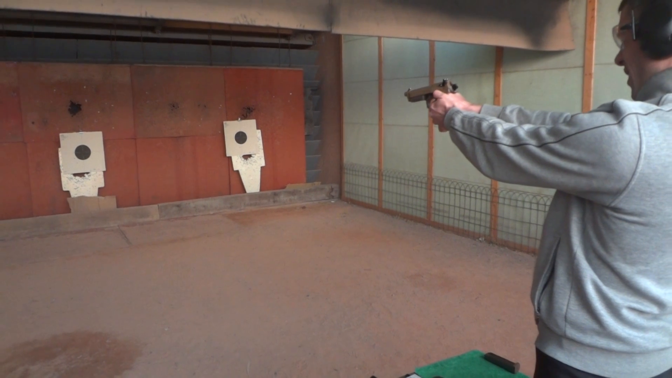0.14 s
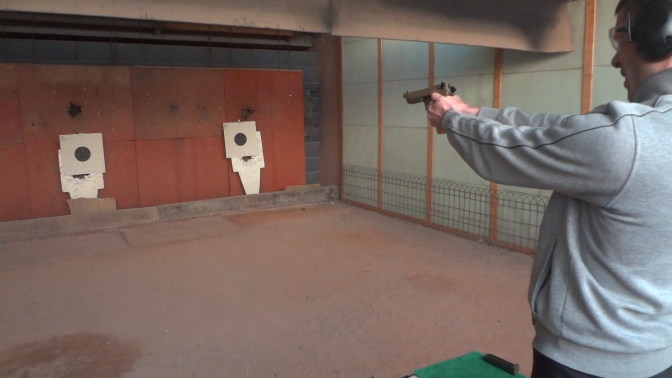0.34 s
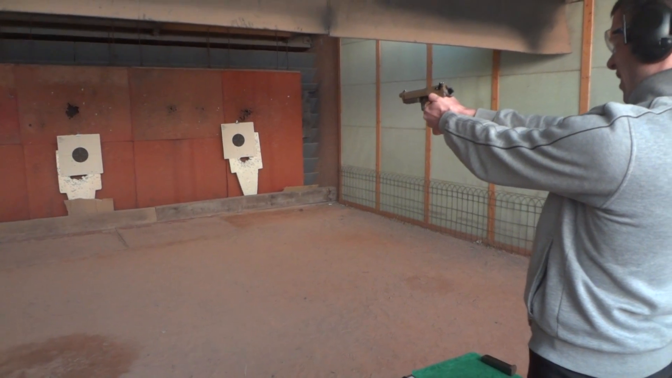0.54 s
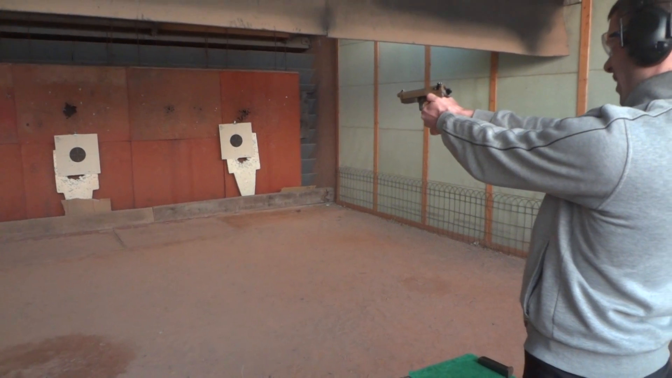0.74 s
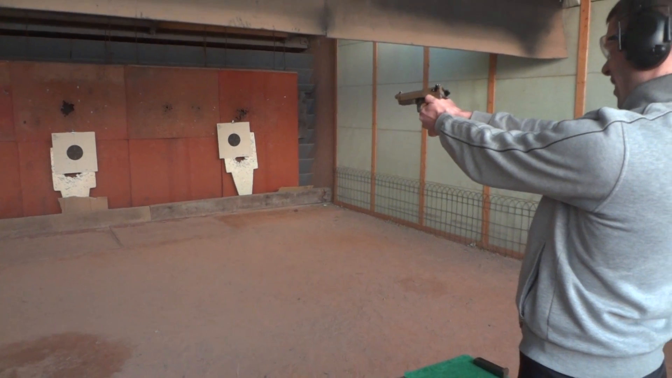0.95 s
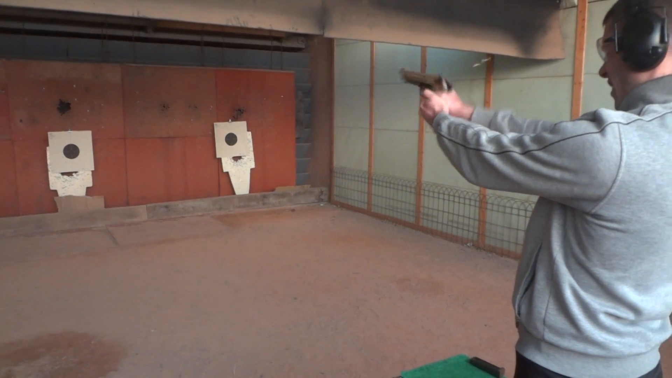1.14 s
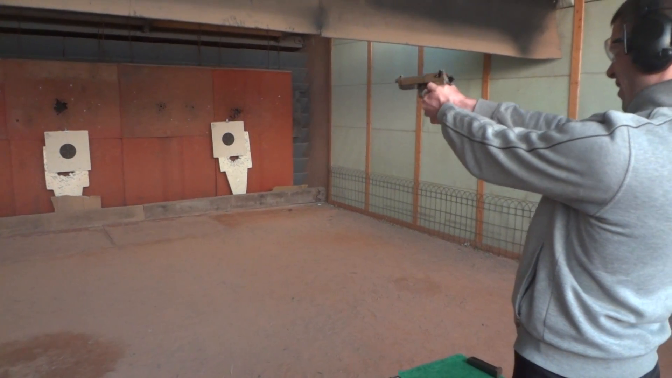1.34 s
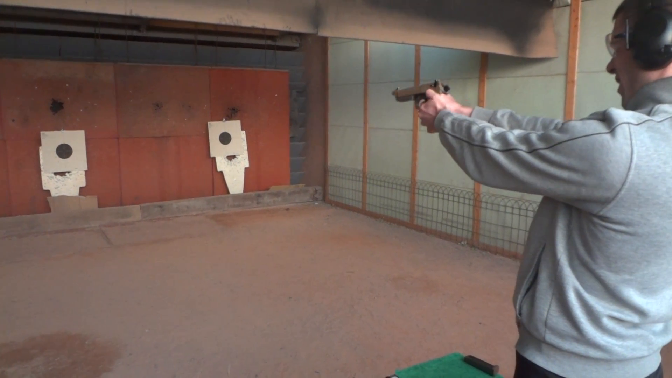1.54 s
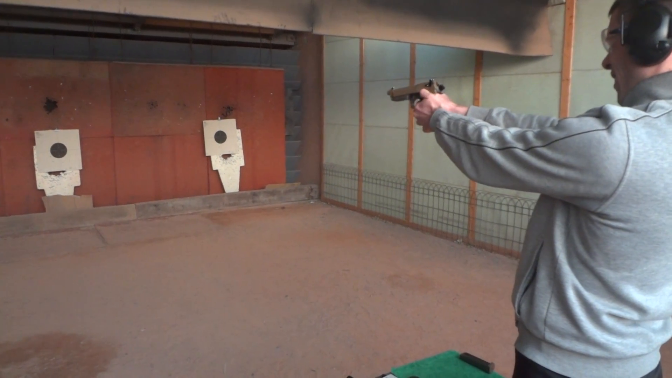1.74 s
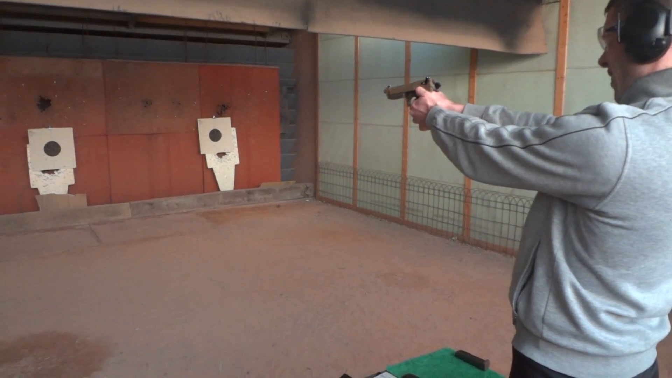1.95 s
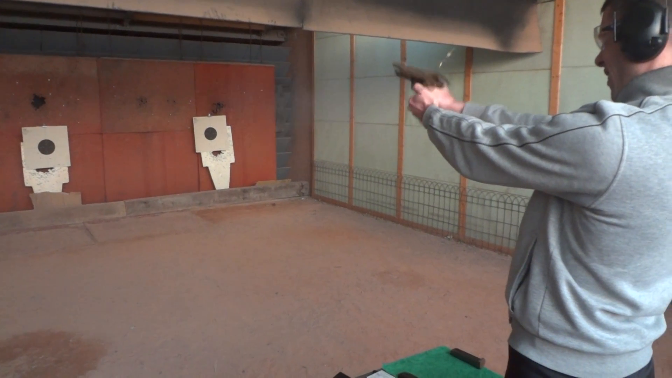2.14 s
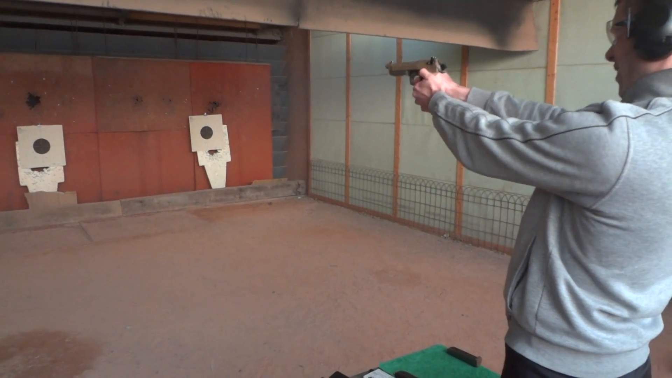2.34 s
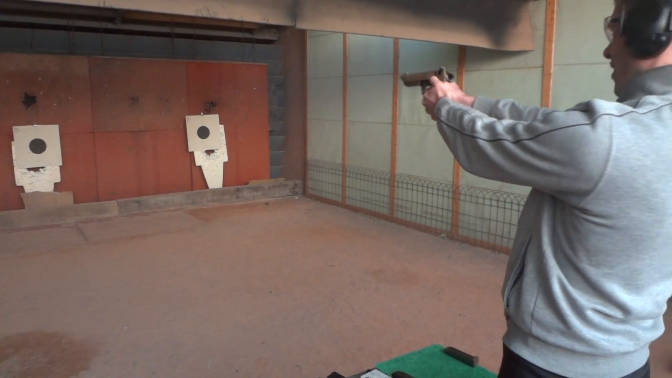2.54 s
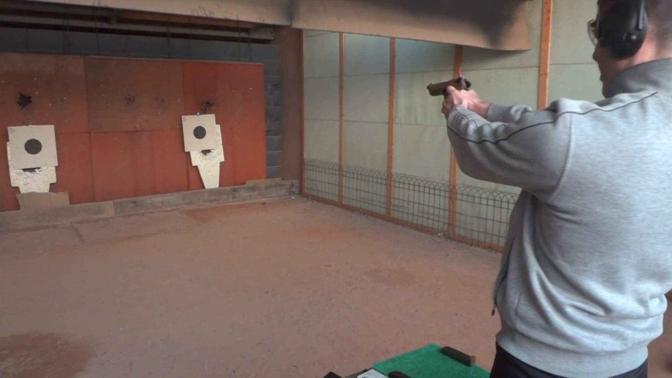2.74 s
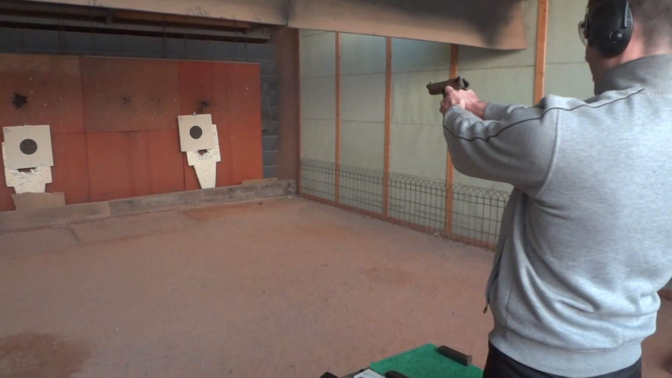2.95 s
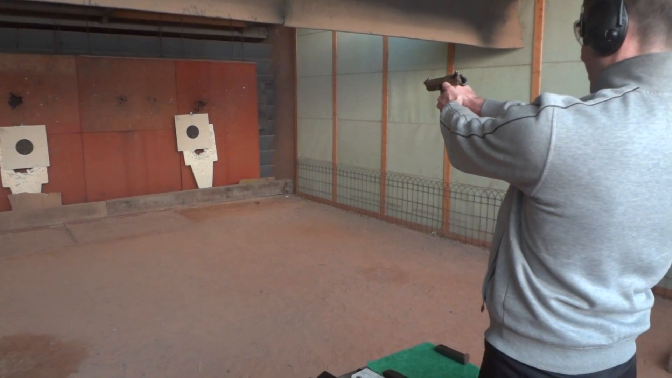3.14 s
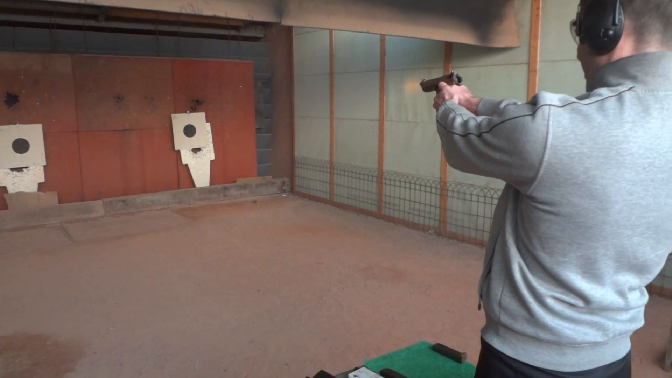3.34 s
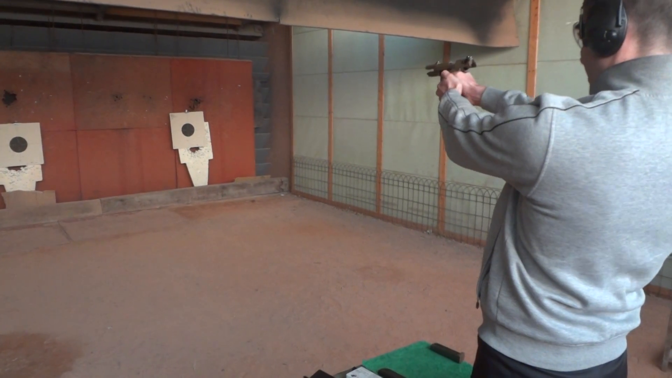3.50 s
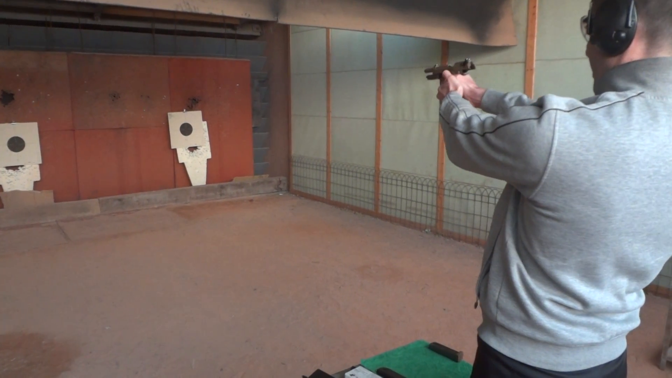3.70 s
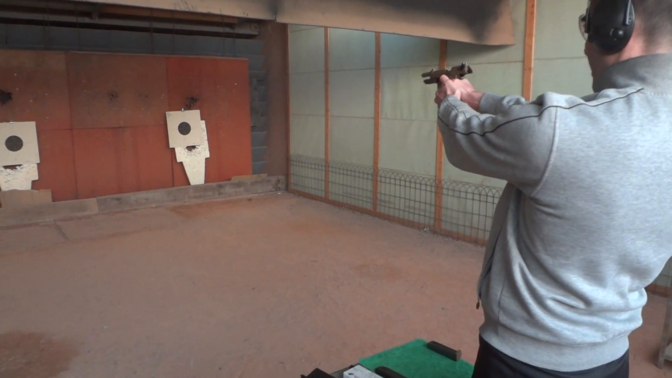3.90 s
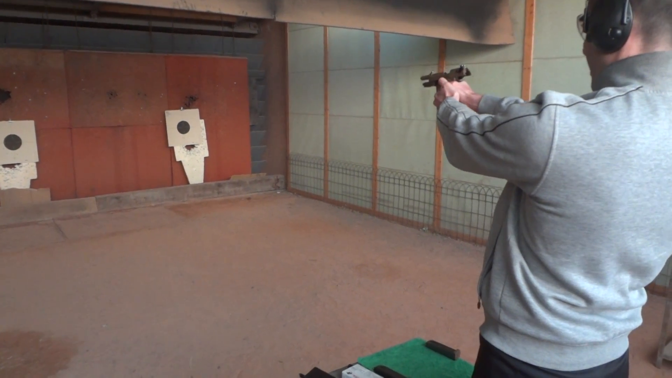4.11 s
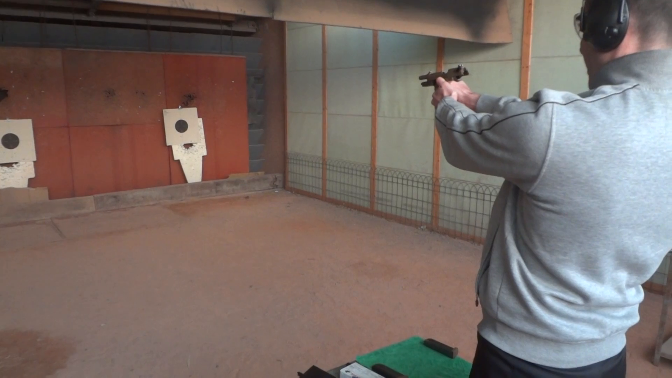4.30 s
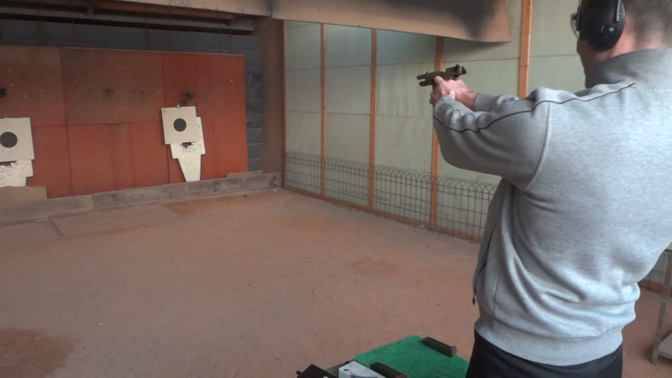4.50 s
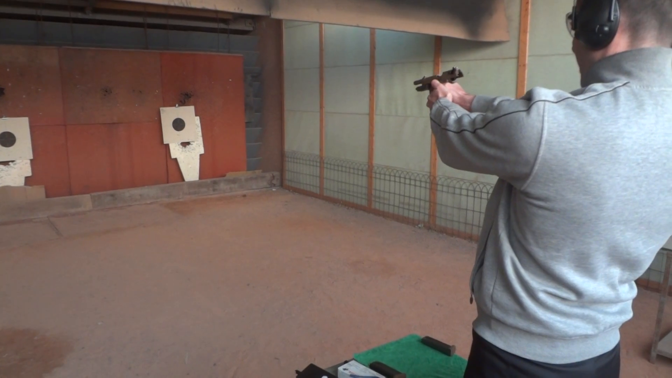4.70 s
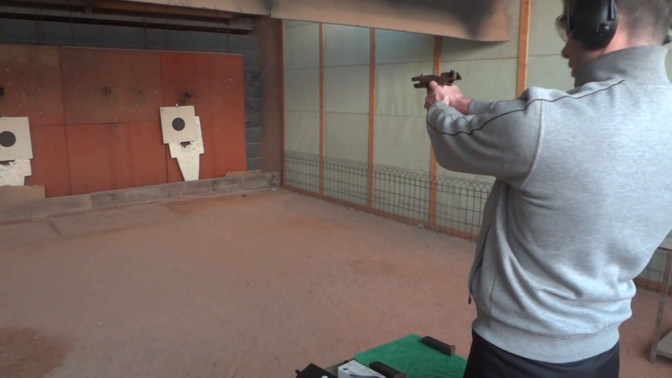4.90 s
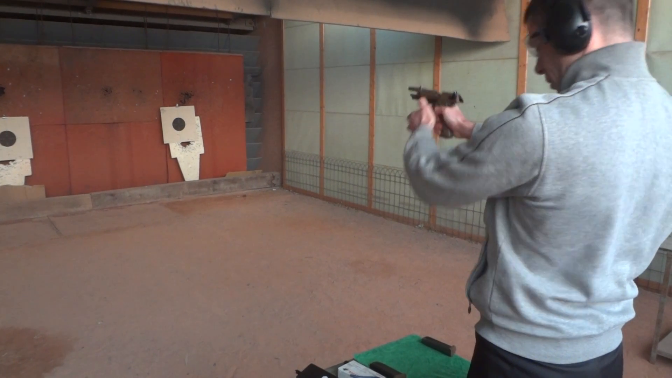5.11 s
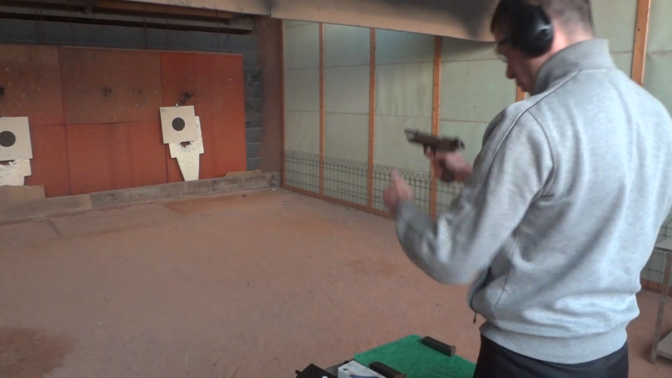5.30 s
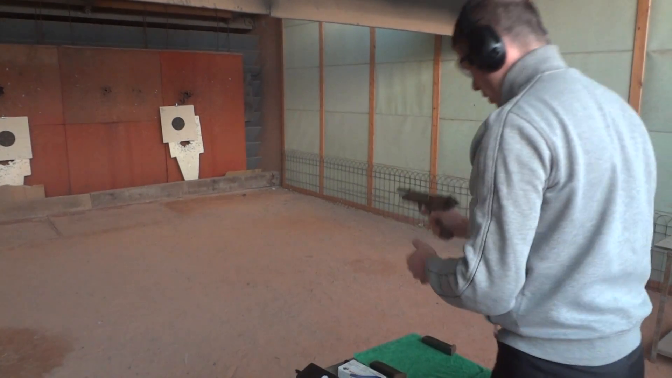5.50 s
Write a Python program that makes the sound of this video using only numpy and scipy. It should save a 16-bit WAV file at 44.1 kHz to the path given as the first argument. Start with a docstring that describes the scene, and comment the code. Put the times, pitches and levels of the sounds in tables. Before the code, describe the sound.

Ventilation hums quietly in a hard-walled indoor shooting range. A pistol a couple of metres from the microphone fires three shots about a second apart, each a sharp, slightly overloaded crack with a roaring echo. The steel bullet trap rings, most clearly after the first. Faint trigger clicks precede the second and third shots, and spent cases tinkle after them. One more click and a soft sleeve rustle follow.

```python
"""A hard-walled indoor range, a small stereo microphone a couple of metres from a pistol.
Ventilation hums. At 1.1 s the first shot cracks: the hall roars and resonates, the steel bullet trap
rings, the microphone overloads and its gain control ducks the fans from then on. A trigger click
precedes each of the next shots, at 2.2 and 3.4 s, and spent cases land after both. The trigger clicks
once more among the last cases, and near 5.5 s a sleeve rustles as the pistol is lowered."""
import sys
import numpy as np
from scipy import signal
from scipy.fft import rfft, irfft, next_fast_len
from scipy.io import wavfile
from scipy.ndimage import uniform_filter1d, minimum_filter1d

SR = 44100
rng = np.random.default_rng(int(sys.argv[2]) if len(sys.argv) > 2 else 0)


def transcribe(u):
    """Save the signal u as a 16-bit wav file named by the first command-line argument.

    u: samples, shape (n,) or (channels, n), limited to [-1, 1]; the rate is SR.
    q: integer samples, one column per channel.
    """
    v = np.clip(np.atleast_2d(u).T, -1, 1)
    q = np.round(v * 32767).astype(np.int16)
    wavfile.write(sys.argv[1], SR, q)


N = 245195
T = np.arange(N) / SR


# The pistol, a couple of metres off:
# (time [s], roar gain [dB], hall gain [dB], boom gain [dB], steel gain [dB], roar decay stretch [x])
SHOTS = [(1.141, 5, 5, 5, 5, 1.02), (2.161, 4.5, 4.5, 1, -3, .92), (3.408, 5, 2.5, -3, -23, .83)]
CRACK_LEAD_S, FIRST_WALL_S = .006, .010
def shots():
    """Each blast fills the range; the steel rings until the next bullet strikes it."""
    out = np.zeros((2, N))
    ends = [row[0] for row in SHOTS[1:]] + [N / SR]
    for (s, roar_db, hall_db, boom_db, steel_db, stretch), end in zip(SHOTS, ends):
        add(out, s - CRACK_LEAD_S, crack())
        add(out, s, undb(roar_db) * roar(stretch))
        add(out, s, slap())
        add(out, s + FIRST_WALL_S, undb(hall_db) * hall())
        add(out, s, undb(boom_db) * boom())
        ring_samples = int((end - s) * SR) + 2048
        add(out, s, undb(steel_db) * steel()[:, :ring_samples])
    return out


def crack(db=26, length_s=.0016, push_db=9, push_s=.00027, hammer_db=-36, lock_s=.0052):
    """Direct sound: the hammer falls, then the muzzle gives a burst of tearing noise and a push of gas."""
    t = T[:1024] - CRACK_LEAD_S
    colour = [(300, -18.5), (1500, -7), (3600, -8.5), (6000, -15), (16000, -28)]
    hammer = undb(hammer_db) * (t > -lock_s) * np.exp(-(t + lock_s) / .01)
    blast = undb(db) * (t > 0) * (t < length_s)
    push_age = np.maximum(t - length_s, 0) / push_s
    push = undb(push_db) * push_age * np.exp(1 - push_age)
    return (blast + hammer) * noise(colour, size=1024) + push


# Reverberation all round the microphone: (frequency [Hz], density [dB], t60 before stretch [s])
ROAR = [(30, -51, 1.4), (80, -41, 1.05), (130, -35, .8), (283, -26, .56), (450, -22, .48), (702, -16, .43),
        (1090, -22.5, .47), (1907, -32.5, .43), (3200, -32.5, .42), (5000, -37, .44), (7940, -40.5, .39),
        (12000, -45, .4), (16000, -51, .28)]
def roar(stretch, gap_s=.0051, build_s=.00043, low_lag=20, bend=1.25, clump_db=2.2, clump_hz=220):
    """Dense wall reflections arrive in clumps; the decay quickens as the far end swallows the blast."""
    size = 65536
    t = np.maximum(T[:size] - gap_s, 0)
    hz, spectrum = diffuse_field(size)
    spectrum = spectrum * undb(lookup(ROAR, hz)[0]) * np.sqrt(SR / 2)
    octave, out = np.log2(hz + 1), 0
    for centre in np.arange(5, 15):  # octave bands, 32 Hz to 16 kHz
        band = irfft(spectrum * np.maximum(1 - np.abs(octave - centre), 0))
        t60 = stretch * lookup(ROAR, 2. ** centre)[1]
        build = 1 - np.exp(-t / (build_s + low_lag / (2. ** centre + 300)))  # the bass builds late
        decay = np.exp(-np.log(1000) * (t / t60) ** bend)
        out = out + band * np.sqrt(build) * decay
    return out * undb(clump_db * wander(clump_hz, size))


def slap(db=12.5, delay_s=.064, spread_s=.027):
    """The side walls and ceiling return the blast in one dense, boxy surge."""
    colour = [(60, -40), (250, -14), (500, -3), (720, 0), (1000, -6), (1600, -22), (16000, -55)]
    surge = np.exp(-((T[:8192] - delay_s) / spread_s) ** 2)
    return undb(db) * surge * noise(colour, size=8192)


# The hall's resonances, two close pairs that throb and then the rest:
# (frequency [Hz], relative peak [dB], swell [s], t60 [s], beat [Hz])
HALL_PAIRS = [(227, -12, .15, .19, 0), (261.5, -12.5, .14, .21, 0), (750, -13, .17, .2, 0),
              (787, -10.5, .18, .18, 0)]
HALL_MODES = [(118, -28, .1, .6, 0), (315, -16, .1, .28, 0), (472, -12, .06, .25, 0),
              (528, -24, .08, .42, 0), (580, -8, .055, .11, 0), (639, -5, .055, .14, 0),
              (677, -17, .12, .25, 0), (715, -10, .06, .13, 0), (763, -49, .52, .05, 0),
              (862, -13, .06, .18, 0), (919, -19, .1, .28, 0), (989, -20, .11, .28, 0),
              (1025, -17, .07, .2, 0), (1153, -21, .07, .2, 0)]
def hall():
    """The first reflection starts all the hall's resonances in step."""
    return modes(HALL_PAIRS + HALL_MODES, size=33075)


# The low end of the room: (frequency [Hz], relative peak [dB], swell [s], t60 [s], beat [Hz])
BOOM_MODES = [(47.5, -25, .27, .6, 2.9)]
def boom():
    """The lowest pair of standing waves swells and beats between the walls."""
    return modes(BOOM_MODES, size=66150)


# Steel downrange: (frequency [Hz], relative peak [dB], swell [s], t60 [s], beat [Hz])
STEEL_MODES = [(251, -39, .04, 3.8, 0), (356.6, -20, .053, 2.7, .72), (652, -57, .04, 6, 0),
               (848, -39, .027, 2.8, 0), (1385, -26, .08, .58, 9), (2240, -31, .08, .52, 7),
               (3290, -42, .08, .5, 0), (4501, -27, .07, .32, 0)]
# Its many weaker modes, heard as a wash: (frequency [Hz], relative density [dB])
STEEL_WASH = [(40, -10), (110, 0), (200, -6), (400, -8), (800, -11), (1400, -20), (4000, -40), (16000, -70)]
def steel(size=98304, wash_db=-41, wash_t60=2.6):
    """The struck bullet trap rings in a few long, wavering modes over a wash of weaker ones."""
    wash = undb(wash_db) * fade(T[:size], wash_t60) * noise(STEEL_WASH, size=size)
    return modes(STEEL_MODES, size=size, waver_db=2.2, waver_hz=16) + wash


# Trigger movements at the firing point:
# (time [s], level [dB], centre [Hz], width [octaves], spring delay [s], spring level [dB])
TRIGGER_CLICKS = [(1.970, -51, 5000, 1.5, .005, -52), (3.108, -45, 3000, .7, .023, -55),
                  (4.216, -41, 1100, .45, .003, -45)]
def trigger(click_t60=.03, snap_db=-2):
    """Each movement clicks; a moment later the spring snaps over and rings."""
    out = np.zeros((2, N))
    for s, db, hz, octaves, delay, spring_db in TRIGGER_CLICKS:
        add(out, s, undb(db) * click(hz, octaves, click_t60))
        snap = undb(snap_db) * click(hz=9000, octaves=1.1, t60=click_t60)
        spring = snap + ping(hz=10980, swell=.009, t60=.11)
        add(out, s + delay, undb(spring_db) * spring)
    return out


# Spent cases landing and bouncing: (time [s], level [dB], centre [Hz])
CASE_LANDINGS = [(2.858, -43, 610), (4.037, -57, 3800), (4.132, -54, 6450), (4.583, -58, 4020)]
# Their brass ringing: (time [s], frequency [Hz], level [dB], t60 [s])
BRASS_RINGS = [(2.36, 11100, -42, .28), (3.785, 8400, -63, .12), (4.10, 9100, -62, .12)]
def cases(t60_at_1khz=.15):
    """Spent cases knock as they land, the brighter knocks dying sooner, and some ring."""
    out = np.zeros((2, N))
    for s, db, hz in CASE_LANDINGS:
        add(out, s, undb(db) * click(hz, octaves=.4, t60=t60_at_1khz / np.sqrt(hz / 1000)))
    for s, hz, db, t60 in BRASS_RINGS:
        add(out, s, undb(db) * ping(hz, swell=.1 * t60, t60=t60))
    return out


def sleeve(db=-62, peak_s=5.48, length_s=.14):
    """Cloth rustles softly as the pistol is lowered."""
    colour = [(100, -20), (500, -3), (1000, 0), (2000, -14), (16000, -35)]
    return undb(db) * np.exp(-((T - peak_s) / length_s) ** 2) * noise(colour, size=N)


# Fan tones behind everything: (frequency [Hz], level [dB])
FAN_TONES = [(102.3, -73), (121.5, -67.5), (220.7, -74), (296.1, -72.5), (834.4, -71)]
# The fans' rumble: (frequency [Hz], relative density [dB])
FAN_RUMBLE = [(15, -10), (35, -4), (80, -2.5), (120, 0), (170, -9), (300, -7.5), (500, -14.5), (850, -15.5),
              (1500, -23.5), (4000, -39.5), (16000, -70.5)]
# Stereo image of rumble and hiss: (frequency [Hz], left minus right [dB], left lead [rad], likeness [0-1])
AIR_PORTS = [(60, -.5, 0, .96), (200, -1, -.25, .8), (400, -1, -.6, .55), (1200, -1, -1.8, .55),
             (2400, 0, -2, .25), (4400, 0, -.3, .25), (8000, 0, 0, .67), (16000, 0, 0, .92)]
def ventilation(rumble_db=-66, waver_db=3, drift_rad=.9):
    """The room tone of the range: steady fan rumble with wavering tones."""
    fan = undb(rumble_db) * noise(FAN_RUMBLE, size=N, mics=AIR_PORTS)
    for hz, db in FAN_TONES:
        amplitude = np.sqrt(2) * undb(db + waver_db * wander(7, N))
        fan = fan + amplitude * np.sin(2 * np.pi * hz * T + drift_rad * wander(8, N))
    return fan


# The range as the two microphone ports hear it:
# (frequency [Hz], left minus right [dB], left lead [rad], likeness [0-1])
RANGE_PORTS = [(50, -.3, -.15, 1), (260, -2.3, -.45, .96), (600, -4, -.7, .93), (1100, -5, -.35, .86),
               (2200, -3, -.05, .76), (4500, -1, .2, .8), (9000, -.1, .1, .89), (16000, 0, 0, .96)]
def ports(hz, mics=RANGE_PORTS):
    """Complex gain of the left and right port."""
    pan_db, lead, _ = lookup(mics, hz)
    sides = np.array([[.5], [-.5]])
    return undb(sides * pan_db) * np.exp(1j * sides * lead)


def diffuse_field(size, mics=RANGE_PORTS):
    """Frequencies and spectrum of white diffuse noise at the two ports."""
    hz = np.arange(size // 2 + 1) * SR / size
    likeness = np.clip(lookup(mics, hz)[2], 0, 1)
    mid, side = rfft(rng.standard_normal((2, size)))
    shared = np.sqrt((1 + likeness) / 2) * mid
    opposed = np.sqrt((1 - likeness) / 2) * side * np.array([[1], [-1]])
    return hz, ports(hz, mics) * (shared + opposed)


def noise(colour, size, mics=RANGE_PORTS):
    """Diffuse noise of rms 1, coloured by rows of (frequency [Hz], relative density [dB])."""
    hz, spectrum = diffuse_field(next_fast_len(size) * 2, mics)
    x = irfft(spectrum * undb(lookup(colour, hz)[0]))[:, :size]
    return x / x.std()


def modes(table, size, waver_db=1.5, waver_hz=14):
    """Resonances woken by a shot; each wavers a little, and close pairs beat."""
    t, out = T[:size], 0
    for hz, db, swell, t60, beat_hz in table:
        level = undb(db + waver_db * wander(waver_hz, size))
        out = out + level * np.cos(np.pi * beat_hz * t) * ring(t, hz, swell, t60)
    return out


def click(hz, octaves, t60, room_db=-22, room_t60=.32):
    """A dry click around one pitch, with a little hall behind it."""
    t = T[:16384]
    skirt = [(-3, -24), (-1, -7), (0, 0), (1, -9), (3, -28), (6, -45)]  # (offset [widths], level [dB])
    colour = [(hz * 2 ** (offset * octaves), db) for offset, db in skirt]
    return (fade(t, t60) + undb(room_db) * fade(t, room_t60)) * noise(colour, size=len(t))


def ping(hz, swell, t60, flutter_db=3, flutter_hz=110):
    """A thin metal ring that flutters as it dies."""
    t = T[:16384]
    return undb(flutter_db * wander(flutter_hz, len(t))) * ring(t, hz, swell, t60)


def ring(t, hz, swell, t60):
    """A resonance that is fed until it tops out after swell seconds, then dies away."""
    age = t / swell + 1e-9
    envelope = np.exp(np.log(1000) * swell / t60 * (np.log(age) + 1 - age))
    return envelope * np.imag(ports(np.array([hz])) * np.exp(2j * np.pi * hz * t))


def wander(rate_hz, size):
    """Smooth random wander, spread near 1."""
    steps = rng.standard_normal(1024)
    return np.interp(T[:size] * rate_hz, np.arange(len(steps)), steps)


def fade(t, t60):
    """Exponential decay, 60 dB down after t60 seconds."""
    return np.exp(-np.log(1000) * t / t60)


def undb(db):
    """Decibels to gain."""
    return 10 ** (np.asarray(db) / 20)


def lookup(table, hz):
    """Every column of a frequency table, read on a log axis."""
    points, *columns = np.transpose(table)
    return [np.interp(np.log(hz + 1e-3), np.log(points + 1e-3), c) for c in columns]


def add(out, s, x):
    """Mix x into out from time s on."""
    i = int(s * SR)
    out[:, i:i + x.shape[1]] += x[:, :N - i]


def hold(db, fall):
    """Follow peaks at once and let go at fall dB a second."""
    return np.maximum.accumulate(db + fall * T) - fall * T


def scene():
    """Everything that reaches the microphone."""
    return shots() + trigger() + cases() + ventilation() + sleeve()


# The microphone's hiss: (frequency [Hz], relative density [dB])
MIC_HISS = [(60, 0), (400, 0), (1000, -1), (2000, -6), (5000, -11), (16000, -16.5)]
HISS_DB, DUCK_DB, TOP_HZ = -68.5, 10, 15900
def record(dry, headroom_db=20, knee_db=-9, squeeze=.71, hiss_share=.3):
    """The microphone saturates; a fast limiter squeezes each shot and a slow gain control stays down."""
    peak_db = 20 * np.log10(np.abs(dry).max(axis=0) + 1e-9)
    fast_db = squeeze * np.maximum(hold(peak_db, fall=320) - knee_db, 0)
    slow_db = hold(np.minimum(fast_db, DUCK_DB), fall=.3)
    gain = undb(-np.maximum(fast_db, slow_db))
    gain = uniform_filter1d(minimum_filter1d(gain, size=89), size=89)  # looks a millisecond ahead
    saturated = undb(headroom_db) * np.tanh(dry / undb(headroom_db))
    hiss_gain = undb(HISS_DB - hiss_share * slow_db)  # the hiss ducks only partly
    hiss = hiss_gain * noise(MIC_HISS, size=N, mics=AIR_PORTS)
    lowpass = signal.ellip(10, .2, 80, TOP_HZ, fs=SR, output="sos")
    return signal.sosfilt(lowpass, saturated * gain + hiss)


dry = scene()
out = record(dry)
transcribe(out)
```